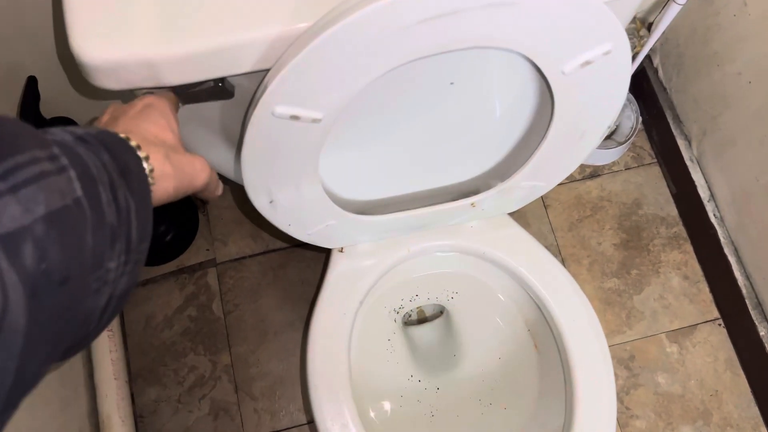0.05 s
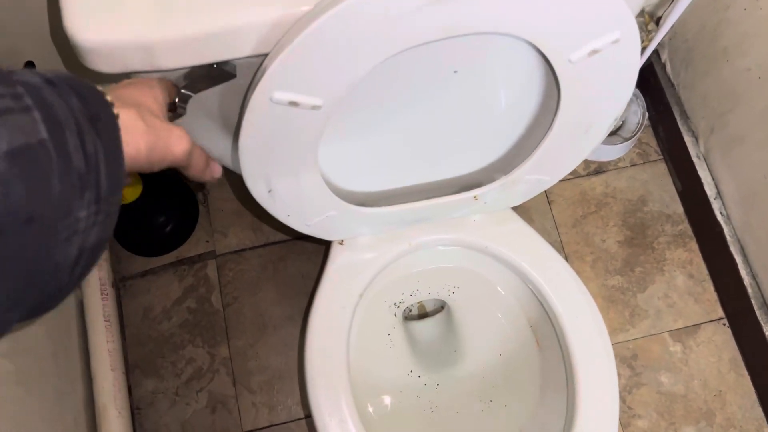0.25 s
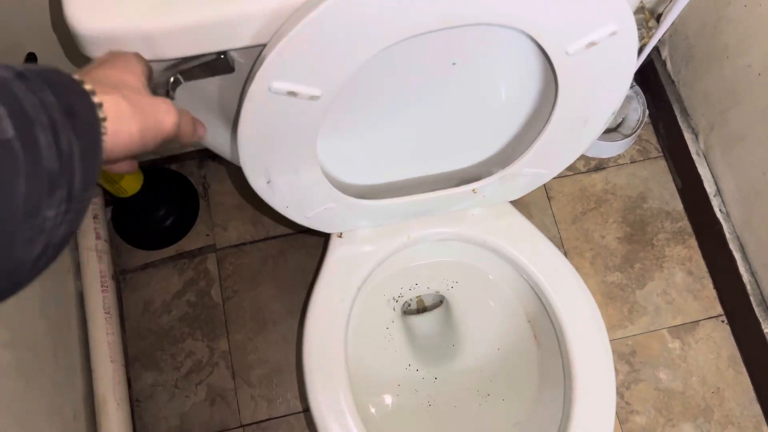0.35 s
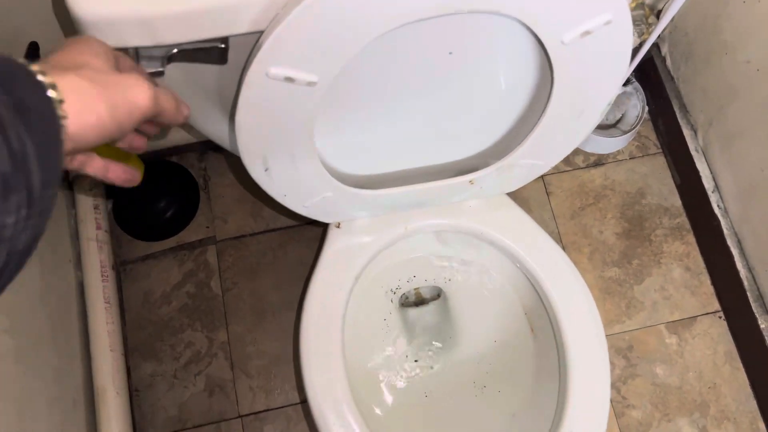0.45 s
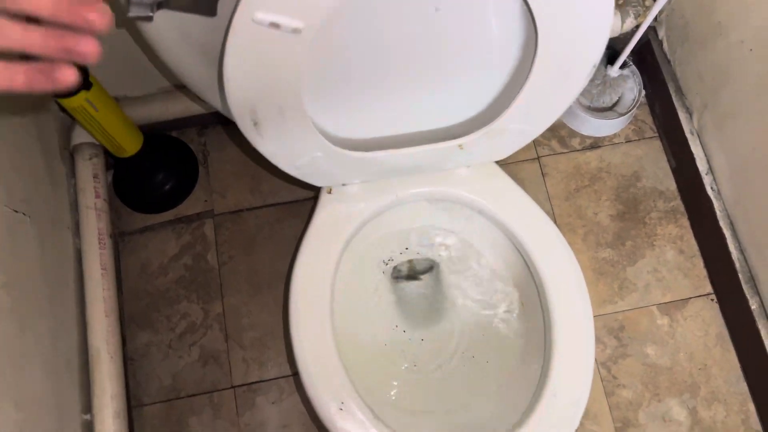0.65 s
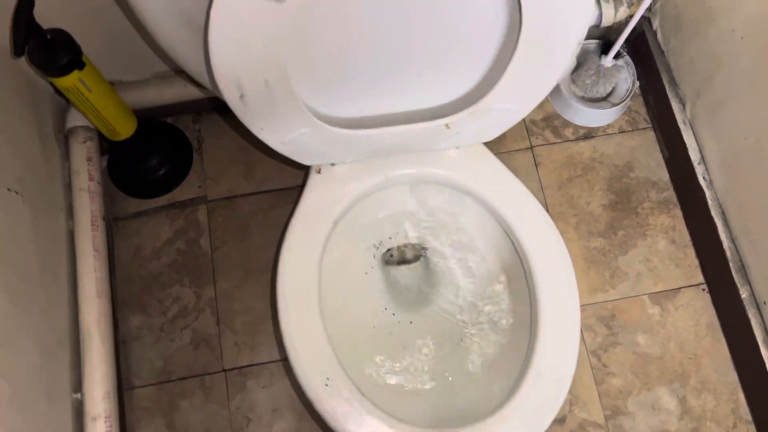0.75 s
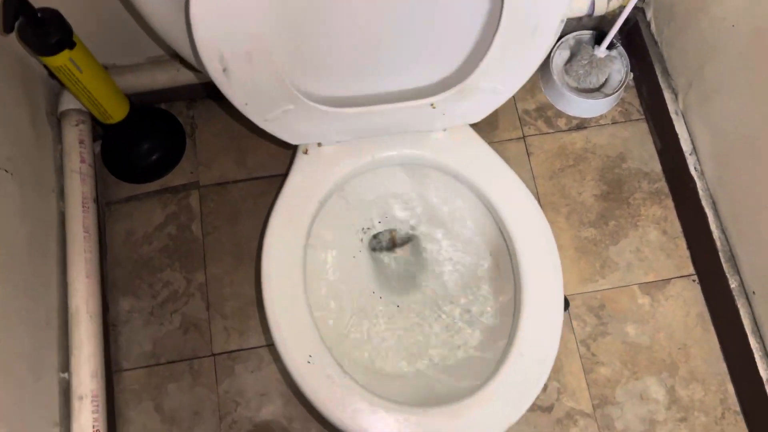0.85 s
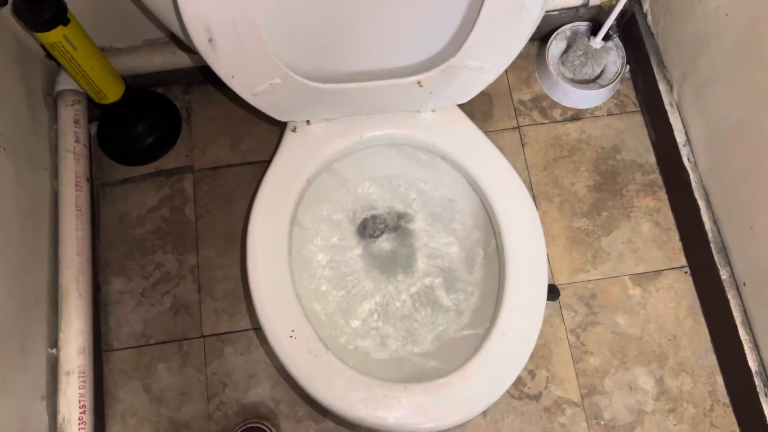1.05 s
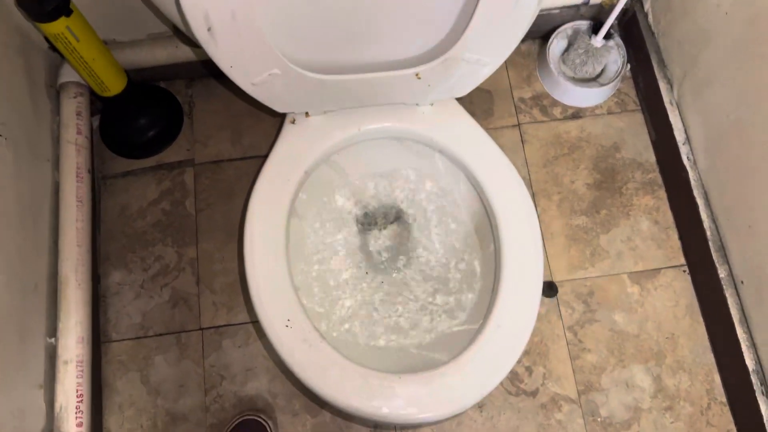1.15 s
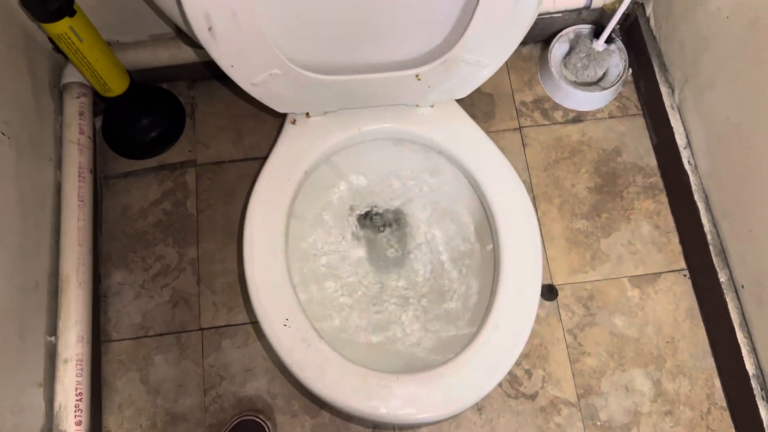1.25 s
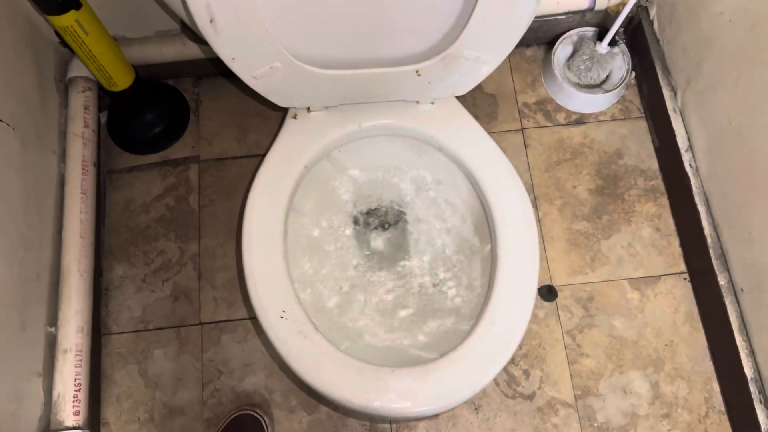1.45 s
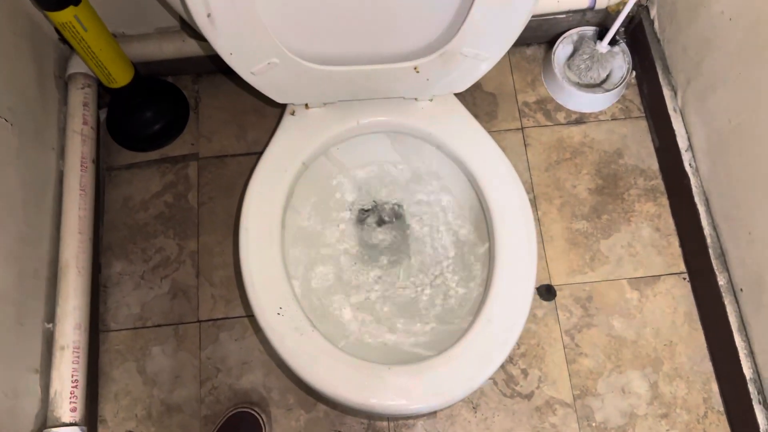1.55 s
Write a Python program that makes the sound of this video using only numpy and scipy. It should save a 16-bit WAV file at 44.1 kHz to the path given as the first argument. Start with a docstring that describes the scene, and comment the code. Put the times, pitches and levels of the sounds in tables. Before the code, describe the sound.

Toilet flush in a small tiled bathroom, valve knocking, then air gulps and swirling water rush

```python
"""A toilet is flushed in a small tiled bathroom, heard from just above the bowl over a low rumble.
First the valve hisses, as a froth of tiny bubbles coloured by the tank, and knocks ring the tank's modes.
Air then gulps through the channels: decaying rising sines over resonant noise. Water next splashes from
the rim as a denser froth, with bursts of noise for drops and slaps. Late on, an air pocket sings in the
swirl as a wavering sine. Decaying noise supplies the reflections of bowl and tiles."""
import sys
import numpy as np
from scipy import signal
from scipy.fft import rfft, irfft, next_fast_len
from scipy.io import wavfile
from scipy.ndimage import map_coordinates

SR = 44100
rng = np.random.default_rng(int(sys.argv[2]) if len(sys.argv) > 2 else 0)


def store_pcm(level_fs):
    """Save levels as 16-bit WAV."""
    pcm = np.round(np.clip(level_fs, -1, 1) * 32767).astype(np.int16)
    wavfile.write(sys.argv[1], SR, np.atleast_2d(pcm).T)


N = 70560

# strength of the splashing: start_s, level_db
SPLASH_LEVEL = [(0, -53.5), (.55, -44.5), (.64, -36.5), (.74, -39), (.81, -28), (.87, -30.5), (.95, -35.5),
                (1.045, -29.5), (1.09, -34.5), (1.16, -31), (1.24, -36.5), (1.275, -32), (1.305, -37.5),
                (1.345, -33.5), (1.39, -40.5), (1.42, -38.5), (1.46, -34.5), (1.485, -36.5), (1.6, -37.5)]
# spectrum of the splashing: frequency_hz, relative_density_db
SPLASH_SPECTRUM = [(100, -52), (350, -4.5), (600, -12.5), (900, -3), (1400, -4), (2200, 1), (3500, 0),
                   (6300, -3.5), (7000, -10.5), (9000, -3.5), (10000, -20), (11500, -24), (16000, -22)]
# resonances of the bowl that colour the splashing: frequency_hz
BOWL_MODES = [612, 722, 776, 1018, 1177, 1484, 1806, 2074, 2174]
BOWL_BOOST_DB, BOWL_HALF_WIDTH_HZ = 8.5, 6.4

# strength of the water leaving the tank: start_s, level_db
OUTFLOW_LEVEL = [(0, -50), (.085, -54), (.125, -37), (.165, -33.5), (.21, -37.5), (.28, -27.5), (.37, -42),
                 (.44, -35.5), (.5, -41), (.54, -35.5), (.6, -45), (.75, -47), (1.6, -44.5)]
# spectrum of the outflow: frequency_hz, relative_density_db
OUTFLOW_SPECTRUM = [(80, -17.5), (170, 5.5), (300, -17.5), (500, -0.5), (790, 1), (950, -17), (1250, -8.5),
                    (2000, -6), (4000, -16.5), (6200, -14), (7200, -18), (9300, -11), (11000, -37),
                    (16000, -28)]
# modes of the tank: frequency_hz, level_db, t60_s
TANK_MODES = [(161, -12, 0.14), (244, -9, 0.091), (309, -4.5, 0.1), (322.2, -2.5, 0.3), (377.5, -7, 0.2),
              (454.1, -1, 0.2), (608, -5, 0.11), (788, -20, 0.4), (1190, -17.5, 0.37), (1575, -22.5, 0.28),
              (2280, -17, 0.19), (2301, -24.5, .35), (2662, -22, 0.29)]
TANK_BOOST_DB, TANK_HALF_WIDTH_HZ = 6.5, 12.2  # the tank colours the outflow with its modes

# knocks of the valve on the tank: start_s, level_db
VALVE_KNOCKS = [(0.2124, -24), (0.2283, -29.5), (0.2557, -12), (0.2627, -10.5), (0.2762, -16), (.317, -18)]
KNOCK_RISE_S, SCUFF_DB, SCUFF_DECAY_S, SCUFF_CORNER_HZ = 0.0028, -10, 0.0038, 800

# strength of the gurgling in the channels: start_s, level_db
GURGLE_LEVEL = [(0, -55.5), (.24, -48.5), (.52, -36.5), (.6, -48.5), (.74, -38.5), (.80, -23), (.86, -28.5),
                (.93, -61.5), (1.06, -41.5), (1.2, -41.5), (1.3, -46), (1.6, -69)]
# resonances of the channels: frequency_hz, half_width_hz, level_db
CHANNEL_MODES = [(232.3, 7, -13.5), (309.7, 27.4, -1), (358.7, 15.7, -2.5), (431, 13, -15),
                 (479.3, 20.7, -5), (695, 15, -10), (788, 14, -14.5), (1139, 13, -14), (1481, 14, -17.5)]
GULP_BANDWIDTH_HZ, GULP_DEPTH_DB = 35, 8  # pace of the uneven gulps, and limit of their swing either way

# large air bubbles, gulps and plops: start_s, pitch_hz, level_db, t60_s
LARGE_BUBBLES = [(.175, 515, -23.5, 0.064), (.415, 461, -27, 0.31), (.468, 317, -30, 0.2),
                 (0.659, 1860, -25.5, 0.035), (0.701, 1955, -21.5, 0.033), (0.687, 306.6, -22.5, 0.14),
                 (0.75, 345, -21, 0.048), (0.774, 470, -24, 0.059), (.772, 662, -23.5, 0.093),
                 (.84, 696, -25.5, 0.23), (.79, 1140, -27.5, 0.24), (.794, 288, -21.5, 0.29),
                 (.803, 349, -18, 0.073), (0.801, 231, -27.5, 0.35), (.831, 324.7, -20, 0.13),
                 (.895, 1520, -29, .1), (.968, 1020, -28, 0.082), (1.03, 337, -31.5, 0.082),
                 (1.084, 333, -25.5, 0.047), (1.155, 433, -27.5, 0.056), (1.187, 1804, -31.5, 0.13),
                 (1.207, 321, -26.5, 0.092), (1.31, 566, -28, .06), (1.333, 2080, -24.5, 0.058),
                 (1.433, 1780, -25, 0.077), (1.5, 549, -26, 0.06), (1.512, 727, -23, 0.063),
                 (1.566, 378, -32.5, 0.39)]
BUBBLE_RISE_CYCLES = 0.86  # time constant of the onset
BUBBLE_GLIDE = 0.034  # the pitch rises by twice this share over one t60

# an air pocket singing in the swirl: start_s, pitch_hz, level_db
AIR_POCKET = [(1.269, 640, -50), (1.32, 594, -38), (1.389, 605.7, -58), (1.449, 537.2, -37),
              (1.5, 577, -45.5), (1.549, 500, -42), (1.6, 446, -57)]
POCKET_WAVER, POCKET_WAVER_HZ = 0.014, 50.3  # rms share of the pitch, bandwidth of the wavering

# drops, spurts and slaps: start_s, centre_hz (before the splash spectrum), level_db, decay_s
WATER_SLAPS = [(.105, 640, -33.5, 0.068), (.14, 3560, -31.5, 0.027), (.16, 620, -32.5, 0.03),
               (.16, 1640, -31.5, 0.042), (0.409, 4000, -37.5, 0.04), (.443, 1300, -30, .011),
               (.52, 3800, -33.5, 0.0096), (.54, 1330, -29.5, .008), (.778, 1070, -31, 0.0083),
               (.939, 2900, -18.5, 0.02), (1.185, 2050, -29, 0.039), (1.321, 3750, -26, 0.021),
               (1.35, 3700, -25, 0.0067), (1.432, 1860, -25.5, 0.015), (1.535, 2040, -33.5, 0.021)]
SLAP_OCTAVES = 0.33  # standard deviation of the band
SLAP_DROPS_PER_S, SLAP_HISS, SLAP_RISE = 1500, .2, .25  # hiss between drops, rise as a share of decay

# single drops: start_s, level_db
DROP_TICKS = [(0.721, -25.5), (.897, -24.5), (.927, -26), (1.123, -30.5), (1.181, -30.5), (1.189, -35)]
TICK_HZ, TICK_DECAY_S, TICK_OCTAVES = 8540, .0016, .25

# strength of the rumble in the plumbing: start_s, level_db
RUMBLE_LEVEL = [(0, -46), (.4, -46), (.8, -39.5), (.92, -45.5), (1.25, -47), (1.6, -45)]
# spectrum of the rumble: frequency_hz, relative_density_db
RUMBLE_SPECTRUM = [(10, -17), (42, 1), (60, 6.5), (85, 1), (130, -1.5), (175, -2), (230, -49), (8000, -59)]
RUMBLE_SIDE_DB, HUM_HZ, HUM_DB = -18.5, 59.3, -63.5

# reverberation of the bathroom: frequency_hz, t60_s
ROOM_DECAY = [(150, 0.32), (1000, 0.18), (4000, 0.092), (12000, 0.087)]
ROOM_ONSET_S = 0.0037
# direct sound at the microphones: frequency_hz, energy_share (clipped to 0-1 in use)
DIRECT_SHARE = [(150, 0.5), (400, 0.99), (700, -0.14), (2500, 0.7), (4000, 0.72), (6700, -0.28),
                (7800, 0.3), (12000, 7.5)]
# phase of the direct sound: frequency_hz, left_lead_rad
PHASE_LEAD = [(200, -0.17), (350, 0), (1000, -2.5), (2800, -2), (4500, -1.6), (6500, 4.2), (8000, -9.5),
              (9000, 1.5), (10300, 1.5), (12500, 8.5)]
# colour of the microphone pair: frequency_hz, left_minus_right_db
MIC_BALANCE = [(200, -0.5), (500, 0), (1200, -3.5), (2000, 1.5), (3000, -2.5), (4500, -8.5), (6400, -15.5),
               (7100, -5), (8000, -5.5), (9000, 0.5)]
TANK_WET, BUBBLE_WET = .4, .6  # gain of the reflections of the clunk and of the airy sounds
NEAR_DIRECT = .6  # least share of direct sound in both
EDGE_HZ = 15900


def amp(db):
    """Level to amplitude: 20 dB is a factor of ten."""
    return 10 ** (np.asarray(db) / 20)


def unit(x):
    """Normalization of power: scales to an rms of one."""
    return x / np.sqrt(np.mean(x ** 2) + 1e-20)


def read(points, hz):
    """Interpolation of a table on a logarithmic frequency axis."""
    f, value = np.transpose(points)
    return np.interp(np.log(hz + 1), np.log(f + 1), value)


def level(points):
    """Envelope: the gain at every sample, interpolated in decibels."""
    return amp(np.interp(np.arange(N) / SR, *np.transpose(points)))


def add(mix, start_s, sound):
    """Superposition: adds a sound to the mix, in place, at its time."""
    part = mix[max(round(start_s * SR), 0):][:len(sound)]
    part += sound[:len(part)]


def shaped(x, gain):
    """Linear filtering: multiplies the spectrum by a function of frequency."""
    size = next_fast_len(2 * x.shape[-1])
    spectrum = rfft(x, size) * gain(np.fft.rfftfreq(size, 1 / SR))
    return irfft(spectrum, size)[..., :x.shape[-1]]


def coloured(x, colour):
    """Spectral colouring of a sound, at an rms of one."""
    return unit(shaped(x, lambda hz: amp(read(colour, hz))))


def ringing(x, modes_hz, half_width_hz, boost_db):
    """Resonance: lifts narrow bands around the modes of a vessel, at an rms of one."""
    def response(f):
        """Flat response plus a simple resonance at each mode."""
        peaks = sum(1 / (1 + 1j * (f - hz) / half_width_hz) for hz in modes_hz)
        return 1 + (amp(boost_db) - 1) * peaks
    return unit(shaped(x, response))


def bubble(hz, t60, glide, rise_cycles):
    """Damped bubble oscillation: a dying sine whose pitch rises as the bubble nears the surface."""
    t = np.arange(int(t60 * SR) + 2) / SR
    onset = 1 - np.exp(-t * hz / rise_cycles)
    decay = np.exp(-np.log(1000) * t / t60)
    return onset * decay * np.sin(2 * np.pi * hz * t * (1 + glide * t / t60))


def froth(per_s, spread_db, cycles, glide, clump_db, hiss_db, count=8000):
    """Random superposition: tiny bubbles, arriving in clumps of like size, over a smooth white hiss."""
    clumps, draws, out = rng.standard_normal((64, 12)), rng.random((count, 5)), np.zeros(N)
    kept = draws[:, -1] < per_s * N / SR / count
    when, small, size, ring, _ = draws[kept].T
    # a smooth random map over time and pitch strengthens neighbours together
    place = [when * (len(clumps) - 1), small * (clumps.shape[1] - 1)]
    clump = map_coordinates(clumps, place, order=1)
    hz = 300 + 15000 * small ** 2
    t60 = cycles * (0.26 + ring ** 2) / hz
    strength = amp(spread_db * np.minimum(-np.log(size), 4) + clump_db * clump)
    gain = strength * np.sqrt(np.sqrt(hz) / t60)  # offsets the uneven pitches and decays
    for start_s, f, d, g in zip(when * N / SR, hz, t60, gain):
        add(out, start_s, g * bubble(f, d, glide, 0.084))
    return unit(out) + amp(hiss_db) * rng.standard_normal(N)


def splash():
    """Bubble noise of a jet: water from the rim churns the bowl and excites its resonances."""
    foam = froth(per_s=2600, spread_db=3.2, cycles=85, glide=.05, clump_db=3, hiss_db=-10)
    churn = coloured(foam, SPLASH_SPECTRUM)
    return level(SPLASH_LEVEL) * ringing(churn, BOWL_MODES, BOWL_HALF_WIDTH_HZ, BOWL_BOOST_DB)


def outflow():
    """Resonance driven by flow: water rushes out of the tank and sets it ringing."""
    foam = froth(per_s=1500, spread_db=3, cycles=50, glide=.04, clump_db=4, hiss_db=-8)
    rush = coloured(foam, OUTFLOW_SPECTRUM)
    modes_hz = [mode[0] for mode in TANK_MODES]
    return level(OUTFLOW_LEVEL) * ringing(rush, modes_hz, TANK_HALF_WIDTH_HZ, TANK_BOOST_DB)


def valve():
    """Modal impact: each knock rings the tank, with a short dull scuff of the linkage."""
    t, out = np.arange(SR // 2) / SR, np.zeros(N)
    ring = sum(amp(db - 60 * t / t60) * np.sin(2 * np.pi * hz * t) for hz, db, t60 in TANK_MODES)
    for start_s, db in VALVE_KNOCKS:
        noise = rng.standard_normal(len(t))
        dull = unit(shaped(noise, lambda f: 1 / (1 + (f / SCUFF_CORNER_HZ) ** 2)))
        scuff = dull * amp(SCUFF_DB) * np.exp(-t / SCUFF_DECAY_S)
        add(out, start_s, amp(db) * (1 - np.exp(-t / KNOCK_RISE_S)) * (ring + scuff))
    return out


def gurgle():
    """Cavity resonance: air and water tumble in uneven gulps through the channels of the bowl."""
    def channels(f):
        """Sum of second-order resonances."""
        return sum(amp(db) / (1 + 1j * (f - hz) / width) ** 2 for hz, width, db in CHANNEL_MODES)
    lumps = unit(shaped(rng.standard_normal(N), lambda f: np.exp(-(f / GULP_BANDWIDTH_HZ) ** 2)))
    tumbling = rng.standard_normal(N) * amp(GULP_DEPTH_DB * np.tanh(lumps))
    return level(GURGLE_LEVEL) * unit(shaped(tumbling, channels))


def plops():
    """Free bubble oscillation: single large bubbles gulp and plop."""
    out = np.zeros(N)
    for start_s, hz, db, t60 in LARGE_BUBBLES:
        add(out, start_s, amp(db) * bubble(hz, t60, BUBBLE_GLIDE, BUBBLE_RISE_CYCLES))
    return out


def slaps():
    """Impact noise: drops and sheets of water hit the surface in short bursts."""
    t, out = np.arange(SR // 5) / SR, np.zeros(N)
    for start_s, hz, db, decay in WATER_SLAPS:
        noise = rng.standard_normal(len(t))
        drops = rng.random(len(t)) < SLAP_DROPS_PER_S / SR
        crackle = noise * np.where(drops, 1, SLAP_HISS)

        def band(f):
            """Bell on an octave axis, tinted by the splash spectrum."""
            bell = np.exp(-.5 * (np.log2((f + 1) / hz) / SLAP_OCTAVES) ** 2)
            return bell * amp(read(SPLASH_SPECTRUM, f))
        envelope = (1 - np.exp(-t / (SLAP_RISE * decay))) * np.exp(-t / decay)
        add(out, start_s, amp(db) * unit(shaped(crackle, band)) * envelope)
    return out


def moan():
    """Frequency modulation: an air pocket sings on a wavering pitch that sinks overall as it grows."""
    start_s, hz, db = np.transpose(AIR_POCKET)
    t = np.arange(N) / SR
    noise = rng.standard_normal((2, N))
    waver, flutter = unit(shaped(noise, lambda f: np.exp(-(f / POCKET_WAVER_HZ) ** 2)))
    pitch = np.interp(t, start_s, hz) * (1 + POCKET_WAVER * waver)
    gain = amp(np.interp(t, start_s, db, left=-np.inf) + 2 * flutter)  # silent before the first point
    return gain * np.sin(2 * np.pi * np.cumsum(pitch) / SR)


def ticks():
    """Brief impact: single drops land with a tiny bright tick of noise."""
    t, out = np.arange(SR // 50) / SR, np.zeros(N)
    for start_s, db in DROP_TICKS:
        noise = rng.standard_normal(len(t))
        crack = unit(shaped(noise, lambda f: 1 / (1 + (np.log2((f + 1) / TICK_HZ) / TICK_OCTAVES) ** 2)))
        add(out, start_s, amp(db) * crack * np.exp(-t / TICK_DECAY_S))
    return out


def rumble():
    """Mid and side sum: low rumble of the plumbing and a faint hum, nearly equal at both microphones."""
    hum = amp(HUM_DB) * np.sin(2 * np.pi * HUM_HZ * np.arange(N) / SR)
    mid, side = coloured(rng.standard_normal((2, N)), RUMBLE_SPECTRUM)
    return level(RUMBLE_LEVEL) * (mid + amp(RUMBLE_SIDE_DB) * np.array([side, -side])) + hum


def bathroom(x, wetness=1, least_direct=0, early_db=6, early_s=0.0049):
    """Diffuse reverberation: direct sound plus dense reflections, different at each microphone."""
    hz, t, z = signal.stft(rng.standard_normal((2, SR // 2)), SR, nperseg=256)
    # a brief early surplus is added to the decay; each band is scaled to equal energy
    fade = amp(-60 * t / read(ROOM_DECAY, hz)[:, None]) * (1 + amp(early_db) * np.exp(-t / early_s))
    tail = signal.istft(z * fade / np.linalg.norm(fade, axis=1, keepdims=True), SR)[1]
    tail = tail * np.minimum(np.arange(tail.shape[1]) / SR / ROOM_ONSET_S, 1)
    tail = tail / np.linalg.norm(tail, axis=1, keepdims=True)
    wet = signal.fftconvolve(x[None], tail, axes=1)[:, :N]

    def direct_path(f):
        """Direct share, with the phase lead split between left and right."""
        share = np.clip(read(DIRECT_SHARE, f), least_direct, 1)
        return np.sqrt(share) * np.exp(1j * np.outer([.5, -.5], read(PHASE_LEAD, f)))
    direct = shaped(x, direct_path)
    reflected = shaped(wet, lambda f: np.sqrt(1 - np.clip(read(DIRECT_SHARE, f), 0, 1)))
    return direct + wetness * reflected


def scene():
    """Superposition: the whole flush; the water is two independent sources, each with its reflections."""
    water = sum(bathroom(splash() + outflow()) for _ in range(2)) / np.sqrt(2)
    air = bathroom(plops() + gurgle() + moan(), BUBBLE_WET, NEAR_DIRECT)
    clunk = bathroom(valve(), TANK_WET, NEAR_DIRECT)
    drops = bathroom(slaps() + ticks())
    return water + air + clunk + drops + rumble()


def record(dry):
    """Linear filtering: the two microphones differ in colour; then a low-pass limits the band."""
    pair = shaped(dry, lambda f: amp(np.outer([.5, -.5], read(MIC_BALANCE, f))))
    low_pass = signal.firwin(511, EDGE_HZ, window=("kaiser", 9), fs=SR)
    return signal.oaconvolve(pair, low_pass[None], "same")


dry = scene()
out = record(dry)
store_pcm(out)
```